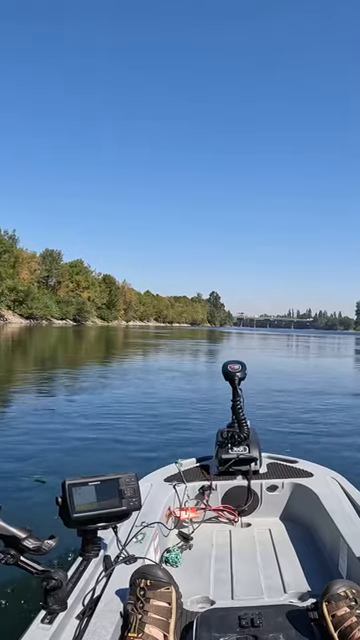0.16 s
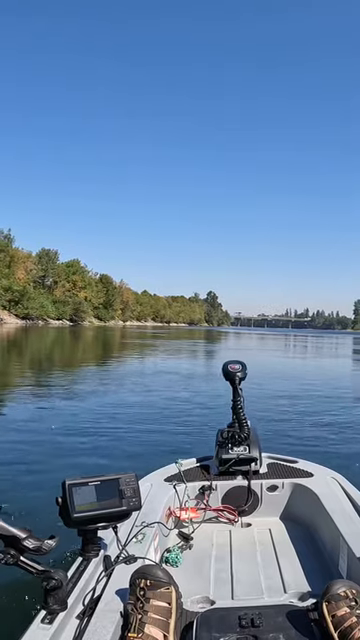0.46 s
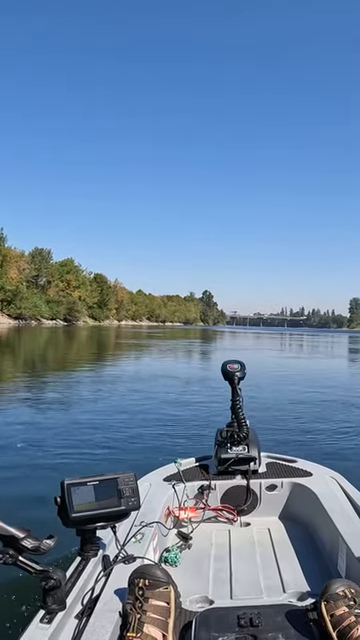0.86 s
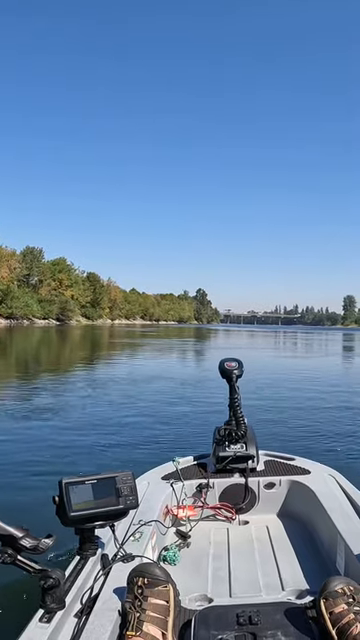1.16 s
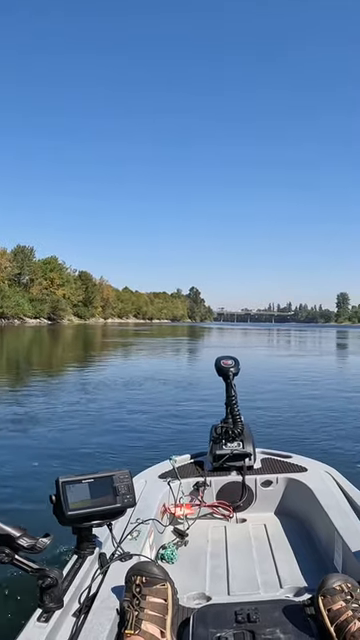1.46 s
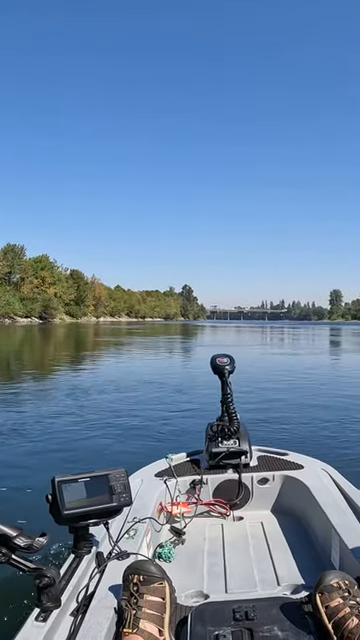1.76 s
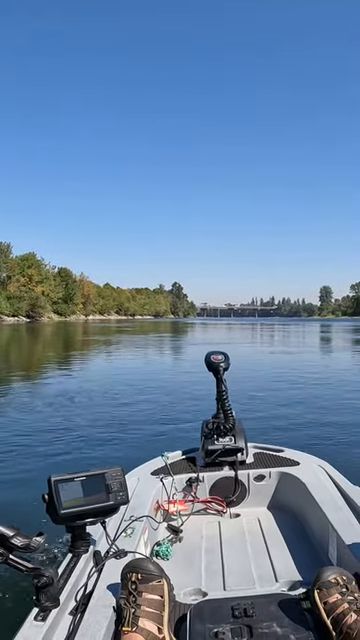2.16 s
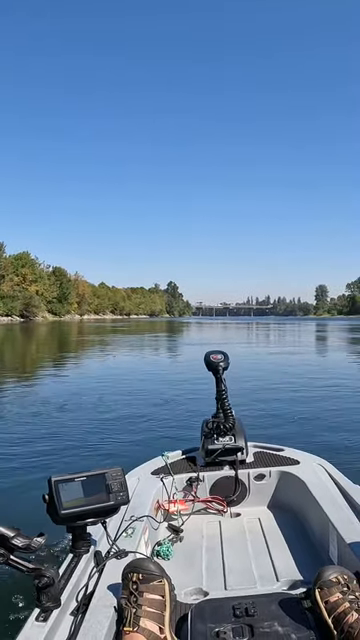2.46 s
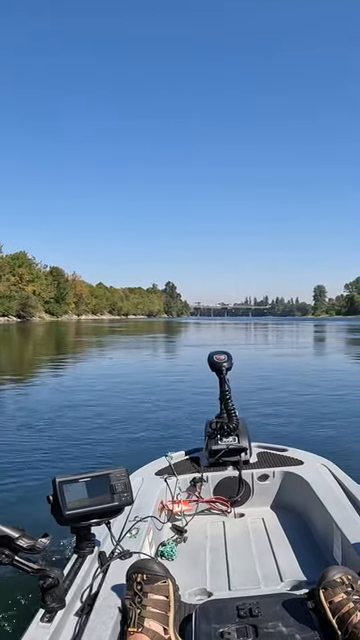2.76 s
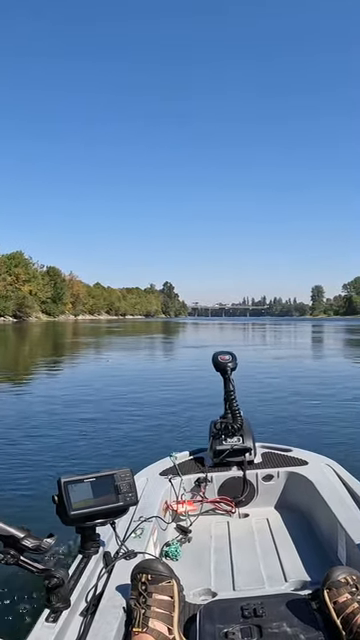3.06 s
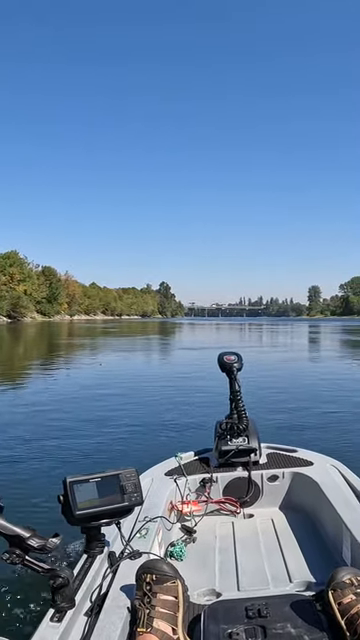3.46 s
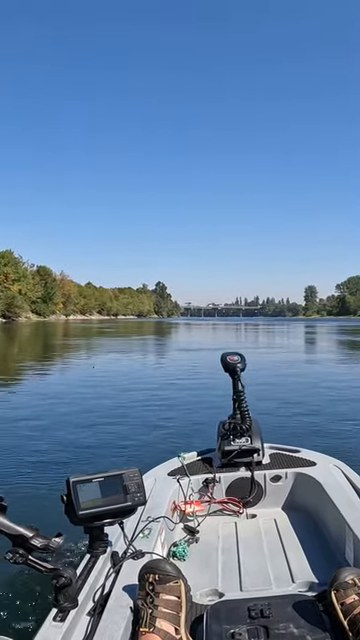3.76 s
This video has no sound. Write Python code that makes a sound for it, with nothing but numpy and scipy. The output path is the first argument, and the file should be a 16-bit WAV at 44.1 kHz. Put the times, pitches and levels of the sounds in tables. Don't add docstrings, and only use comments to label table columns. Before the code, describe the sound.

A small boat's motor holds a low, slightly wavering hum with its octave for about four seconds, stronger after 2.7. Air buffets the close outdoor microphone in a lumpy rumble; water roars dully along the hull, with soft wake wash and faint fizzing spray. Tiny ticks come near 0.2, 1.0 and 2.9, low plops at 2.1 and 3.4, and faint splashes around 1.0, 2.3, 2.75 and 3.2.

```python
import sys
import numpy as np
from scipy import signal
from scipy.fft import rfft, irfft
from scipy.io import wavfile
from scipy.ndimage import uniform_filter1d

SR = 44100
rng = np.random.default_rng(int(sys.argv[2]) if len(sys.argv) > 2 else 0)


def unload_wav(signal):
    wavfile.write(
        sys.argv[1],
        SR,
        np.round(np.clip(np.atleast_2d(signal).T, -1, 1) * 32767).astype(np.int16),
    )


def nominal_scale(level):
    x = np.asarray(level, float) / 20
    return 10 ** x


N = 172431

# (time [s], air rumble level [dB], water wash level [dB])
FLOW = [(0.02, -35.5, -35), (0.17, -28, -35), (1.59, -30, -39), (1.98, -29.5, -37.5), (2.08, -26, -37.5),
        (2.13, -30.5, -38.5), (2.39, -29.5, -36.5), (2.41, -25, -37), (2.44, -34, -37.5),
        (2.53, -28, -37.5), (3.05, -32, -38), (3.1, -30, -38), (3.14, -32.5, -37.5), (3.27, -29, -38),
        (3.7, -32.5, -38.5), (3.78, -31, -37.5), (3.85, -29.5, -38)]
TICK_CYCLES = 5.5


def evened(x):
    return x / np.sqrt(np.mean(x ** 2) + 1e-20)


def curve(table, column):
    rows = np.array(table)
    return np.interp(np.arange(N) / SR, rows[:, 0], rows[:, column])


def slow(hz):
    z = rfft(rng.standard_normal(N))
    rate_hz = np.arange(len(z)) * SR / N
    return evened(irfft(z * np.exp(-(rate_hz / hz) ** 2), N))


def noise(shape, size, patchy_db):
    frames = 4 * N // size + 6
    hz = np.fft.rfftfreq(size, 1 / SR)
    real, imaginary, patches = rng.standard_normal((frames, len(hz), 3)).T
    patches = uniform_filter1d(patches, size=10, axis=0)
    patches = evened(uniform_filter1d(patches, size=8, axis=1))
    f, db = np.transpose(shape)
    octaves = np.log2(hz + 1)
    below = np.maximum(np.log2(f[0]) - octaves, 0)
    above = np.maximum(octaves - np.log2(f[-1]), 0)
    db = np.interp(octaves, np.log2(f), db) - 90 * (below + above)
    z = (real + 1j * imaginary) * nominal_scale(db[:, None] + patchy_db * patches)
    return evened(signal.istft(z, nperseg=size, noverlap=3 * size // 4)[1][:N])


def blip(hz, cycles):
    rise = 0.15
    u = np.arange(0, 1, hz / SR / cycles)
    swell = np.sin(np.pi * u ** 0.6) ** 2
    return np.sin(2 * np.pi * cycles * u * (1 - rise / 2 + rise * u)) * swell


def add(mix, s, sound):
    part = mix[round(s * SR):][:len(sound)]
    part += sound[:len(part)]


def motor():
    # (time [s], hum pitch [Hz], hum level [dB], octave level [dB])
    running = [(0.05, 109, -26.0, -39.5), (0.29, 109.4, -28.5, -33), (0.53, 109.8, -25.5, -37),
               (0.76, 111.1, -21, -38), (1.0, 109.4, -28.5, -34.5), (1.24, 110.5, -23, -28.5),
               (1.48, 110.3, -25, -32.5), (1.72, 110.5, -25, -27.5), (1.96, 110.5, -26.5, -33.5),
               (2.19, 111.1, -25, -35), (2.43, 110.2, -28, -31), (2.67, 109.2, -21.5, -27.5),
               (2.91, 110.2, -23.5, -25), (3.15, 109.5, -21, -29.5), (3.38, 109.1, -20, -35.5),
               (3.62, 107.7, -21.5, -36.5), (3.86, 106.8, -19, -31.5)]
    # (multiple of hum pitch [1], level [dB])
    shaft_orders = [(.625, -42.5), (0.749, -52.5), (1.249, -37.5), (1.625, -46.5), (1.75, -51)]
    third_db, octave_turn, third_turn = -21, 0.035, -0.054
    waver_db, shaft_waver_db = 1.3, 1.5
    wander_turns, wander_hz = 0.028, 4

    turns = np.cumsum(curve(running, column=1)) / SR + wander_turns * slow(wander_hz)
    hum_db = curve(running, column=2) + waver_db * slow(10.0)
    hum = nominal_scale(hum_db) * np.cos(2 * np.pi * turns)
    octave = np.cos(2 * np.pi * (2 * turns + octave_turn))
    third = nominal_scale(third_db) * np.cos(2 * np.pi * (3 * turns + third_turn))
    upper_db = curve(running, column=3) + waver_db * slow(14.0)
    upper = nominal_scale(upper_db) * (octave + third)
    shaft = np.zeros(N)
    for multiple, db in shaft_orders:
        order = np.cos(2 * np.pi * (multiple * turns + rng.random()))
        shaft += nominal_scale(db + shaft_waver_db * slow(wander_hz)) * order
    return np.sqrt(2) * (hum + upper + shaft)


def air():
    # (frequency [Hz], density [dB per Hz])
    rumble_shape = [(5, -8), (12, -4), (25, -2.5), (55, 1.5), (80, -4), (100, -10.5), (130, -20)]
    level_db = curve(FLOW, column=1) + 0.64 + 0.6 * slow(5.5)
    return nominal_scale(level_db) * noise(rumble_shape, size=2048, patchy_db=1.5)


def hull():
    # (frequency [Hz], density [dB per Hz])
    roar_shape = [(75, -8), (100, -0.5), (150, -2), (190, -3.5), (250, -4.5), (360, -9), (430, -14),
                  (500, -22.5)]
    level_db = curve(FLOW, column=2) + 8 + 0.6 * slow(6.1)
    return nominal_scale(level_db) * noise(roar_shape, size=2048, patchy_db=1.17)


def wash():
    # (frequency [Hz], density [dB per Hz])
    wash_shape = [(300, 3), (450, 0.5), (800, -0.5), (1100, -7), (1550, -10), (2100, -18.5), (3500, -26),
                  (4300, -35)]
    level_db = curve(FLOW, column=2) + 0.57 + 0.26 * slow(8.5)
    return nominal_scale(level_db) * noise(wash_shape, size=1024, patchy_db=0.67)


def fizz():
    # (frequency [Hz], density [dB per Hz])
    fizz_shape = [(3300, -6), (4500, 0), (5600, -2.5), (6500, -6), (8200, -11), (9300, -18.5), (10300, -23),
                  (10800, -32)]
    flow_db = curve(FLOW, column=2)
    flicker_db = 0.99 * (flow_db - flow_db.mean()) + 0.8 * slow(25)
    return nominal_scale(-66 + flicker_db) * noise(fizz_shape, size=512, patchy_db=1.34)


def spray():
    # (frequency [Hz], density [dB per Hz])
    mist_shape = [(10500, -4), (11000, -9), (11600, 1.5), (12300, -6)]
    # (frequency [Hz], density [dB per Hz])
    spray_shape = [(11200, -23), (11600, -0.5), (12200, -1), (14300, -4.5), (14800, -27)]
    mist = nominal_scale(-95.5 + 2.5 * slow(9)) * noise(mist_shape, size=512, patchy_db=3.5)
    opening_db = np.interp(np.arange(N) / SR, [0.49, 0.6], [-21, 0])
    top_db = -88.5 + opening_db + 1.2 * slow(30)
    return mist + nominal_scale(top_db) * noise(spray_shape, size=256, patchy_db=3.2)


def splashes():
    # (start [s], length [s], level [dB], centre [Hz])
    puffs = [
        (.94, .06, -56, 3100),
        (1.11, .04, -57, 3000),
        (2.335, .045, -50, 2350),
        (2.75, .045, -53, 2300),
        (3.225, .04, -58, 3500),
    ]
    half_width = 0.2
    out = np.zeros(N)
    for s, length, db, hz in puffs:
        edges = [hz * (1 - half_width), hz * (1 + half_width)]
        band = signal.butter(2, edges, "band", fs=SR, output="sos")
        puff = evened(signal.sosfilt(band, rng.standard_normal(round(length * SR))))
        swell = np.sqrt(2) * np.sin(np.linspace(0, np.pi, len(puff)))
        add(out, s, nominal_scale(db) * swell * puff)
    return out


def ticks():
    # (time [s], peak level [dB], pitch [Hz], overtone level re peak [dB])
    bursts = [(.1705, -39, 6900, -29.5), (.2525, -49.5, 7600, -29), (.3117, -43, 6200, -43),
              (.9586, -39, 6300, -18.5), (1.1239, -42.5, 6300, -40), (1.8285, -55, 5300, -24),
              (2.9028, -54, 6300, -22), (2.9396, -42, 6400, -10.5), (2.966, -47, 5900, -30),
              (3.1212, -52, 6450, -35), (3.5576, -41.5, 6300, -13), (3.7465, -49, 6460, -27)]
    overtone = 2.0
    out = np.zeros(N)
    for s, db, hz, overtone_db in bursts:
        add(out, s, nominal_scale(db) * blip(hz, TICK_CYCLES))
        high = blip(min(overtone * hz, 13500), overtone * TICK_CYCLES)
        add(out, s, nominal_scale(db + overtone_db) * high)
    return out


def plops():
    # (time [s], peak level [dB], pitch [Hz], length [cycles])
    bubbles = [
        (.9355, -37, 2300, 7),
        (2.1385, -27, 620, 3),
        (2.32, -50, 3700, 20),
        (2.425, -39, 1650, 8),
        (3.396, -33, 510, 14),
        (1.413, -56, 13800, 9),
        (2.765, -62, 14200, 9),
        (2.324, -64, 12600, 9),
    ]
    out = np.zeros(N)
    for s, db, hz, cycles in bubbles:
        add(out, s, nominal_scale(db) * blip(hz, cycles))
    return out


def scattered_drops():
    drops_per_s, level_db, spread_db = 140, -71, 2.5
    out = np.zeros(N)
    for hz in np.geomspace(2600, 9000, 16):
        strength = nominal_scale(spread_db * np.minimum(rng.exponential(1, N), 2))
        struck = rng.random(N) < drops_per_s / 16 / SR
        rings = signal.oaconvolve(strength * struck, blip(hz, TICK_CYCLES))[:N]
        out += nominal_scale(level_db - 8.0 * np.log2(hz / 4000)) * rings
    return out


def scene():
    wake = wash() + fizz() + spray()
    drops = ticks() + plops() + scattered_drops()
    return (motor() + air() + hull() + wake + splashes() + drops)[None]


def top_cut(x):
    return signal.sosfilt(signal.butter(12, 14900, fs=SR, output="sos"), x)


def record(dry):
    fade_in = np.minimum(np.arange(N) / 60, 1)
    return top_cut((dry - 0.001) * fade_in)


dry = scene()
out = record(dry)
unload_wav(out)
```